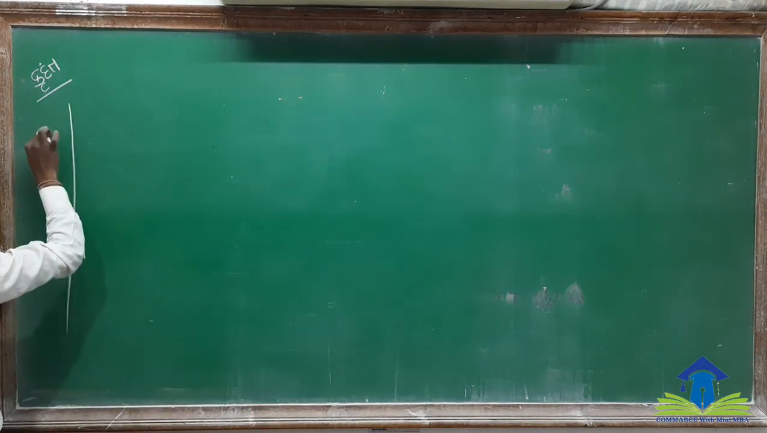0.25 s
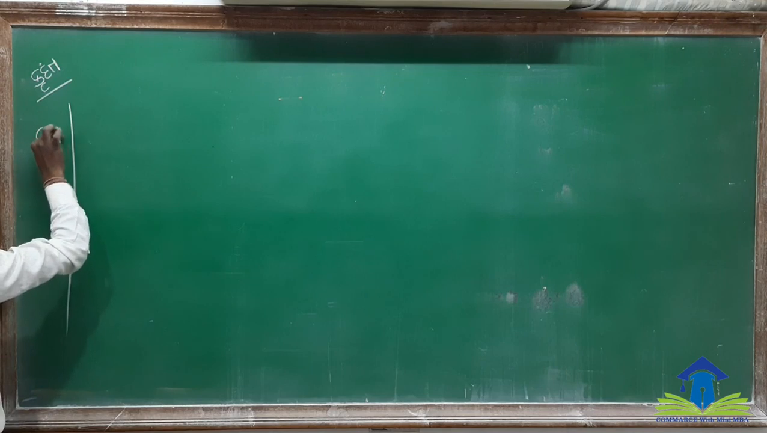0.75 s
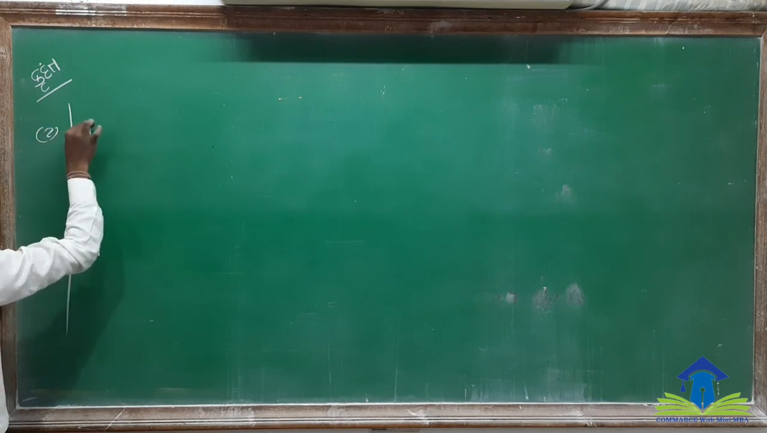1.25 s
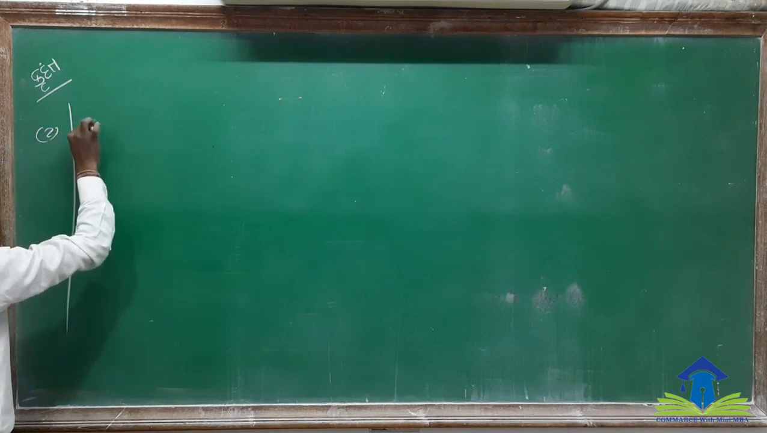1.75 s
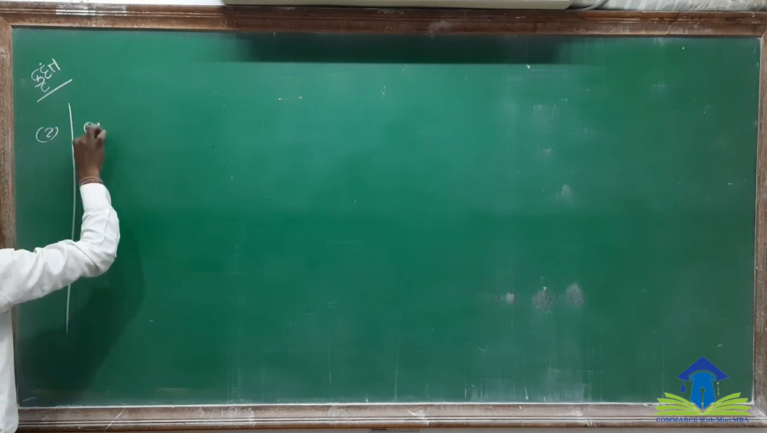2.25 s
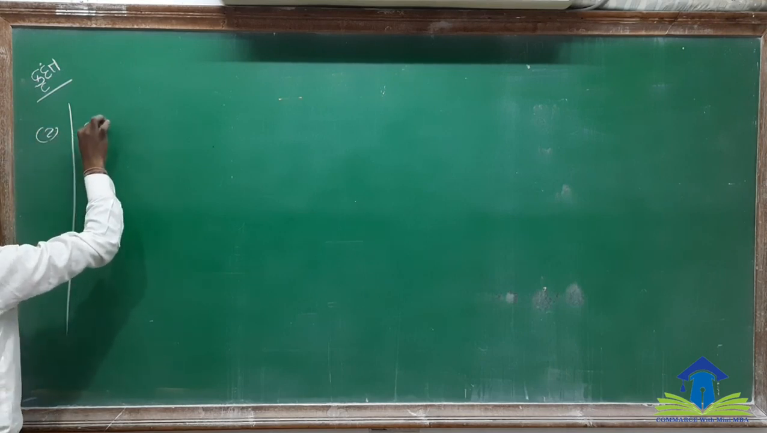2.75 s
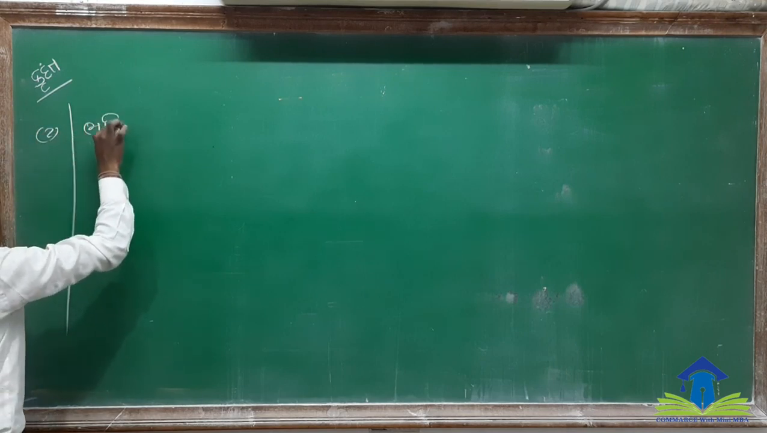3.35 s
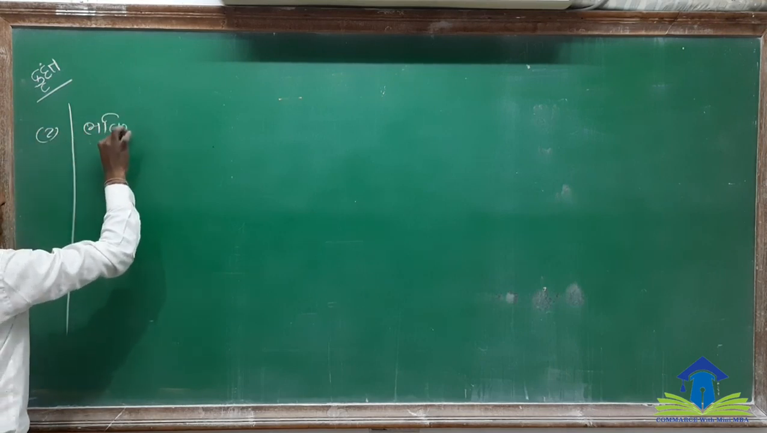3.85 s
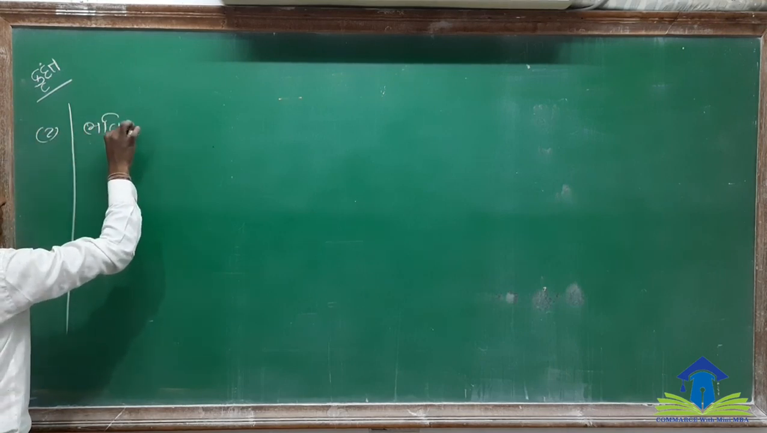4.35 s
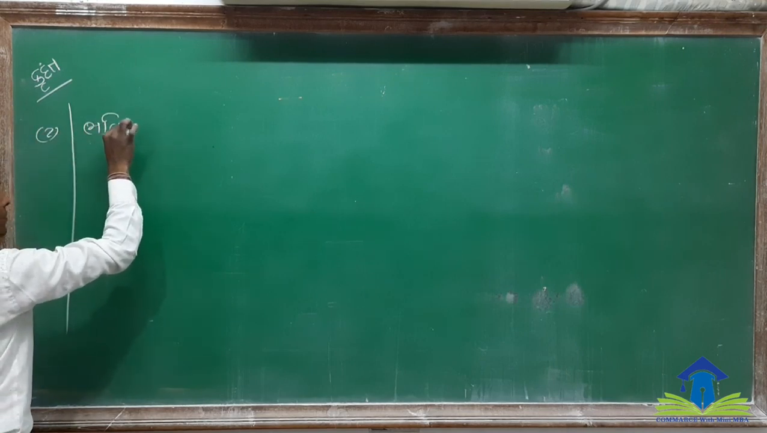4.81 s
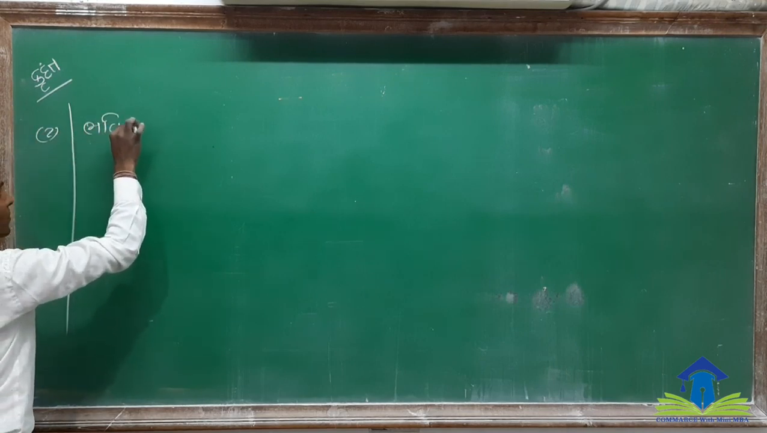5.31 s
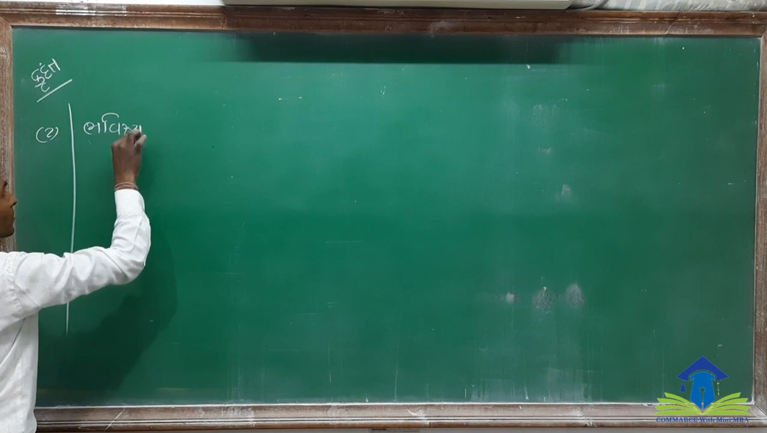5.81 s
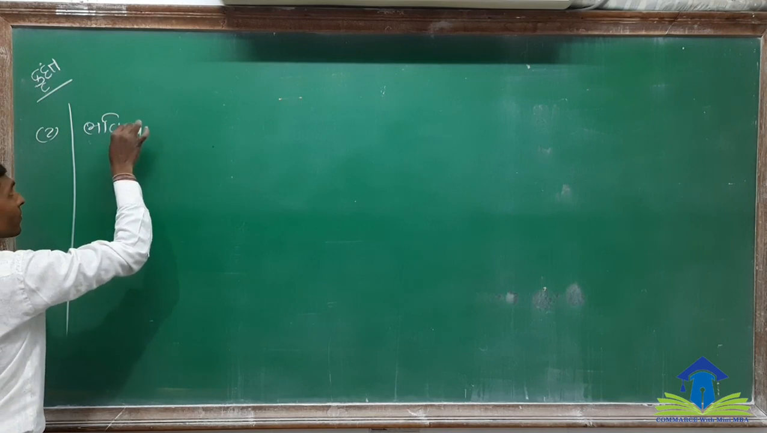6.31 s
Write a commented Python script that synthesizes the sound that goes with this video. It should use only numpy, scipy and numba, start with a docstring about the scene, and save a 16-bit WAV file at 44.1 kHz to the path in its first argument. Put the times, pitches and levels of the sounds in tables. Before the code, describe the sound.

Chalk writes on a chalkboard in a bare, echoing classroom, heard in stereo from a few metres away. A low rumble of fans and traffic runs underneath throughout, gently swelling and easing. From the start, short gritty hissing strokes come in an uneven rhythm, mixed with light, dull taps as the chalk lands, the clearest at about 0.7, 1.7 and 4.2 seconds. The chalk catches in a brief high squeak at 2.1 seconds, then louder ones at 2.8 and 3.3 seconds, each ringing in the room; the overall level dips slightly after the loud ones. Softer strokes continue until a short pause from about 4.3 to 5 seconds. Writing resumes, with a sharp double squeak around 5.6 seconds and a last faint stroke. At about 6.1 seconds two very faint, thin tones swell and fade together over the rumble.

```python
"""Chalk on a classroom board

A hand writes on a wall board in a bare, ringing room; two microphones stand metres away.
The chalk hisses along each stroke, taps down, and now and then sticks and slips into a squeak.
Fans and traffic rumble; two faint tones sound near the end. The gain ducks after loud squeaks."""
import sys
import numpy as np
from scipy import signal
from scipy.fft import rfft, irfft
from scipy.io import wavfile
from scipy.ndimage import uniform_filter1d
from numba import njit

SR = 44100
rng = np.random.default_rng(int(sys.argv[2]) if len(sys.argv) > 2 else 0)


def wav_record(signal):
    """Record a signal, one row per channel, as 16-bit PCM in the file named by sys.argv[1]."""
    frames = np.transpose(np.atleast_2d(signal))
    bounded = np.clip(frames, -1, 1)
    # unit amplitude maps onto the largest positive 16-bit level
    quanta = np.round(bounded * 32767).astype(np.int16)
    wavfile.write(sys.argv[1], SR, quanta)


N = 289886


def undb(db):
    return 10 ** (np.asarray(db) / 20)


def unit_rms(x):
    return x / np.sqrt(np.mean(x ** 2))


def log_interp(table, hz):
    """Read (f/Hz, value) points on a log-frequency axis."""
    f, value = np.transpose(table)
    return np.interp(np.log(np.maximum(hz, 1)), np.log(f), value)


def wander(rate_hz):
    """Random steps, smoothed twice; spread near 1."""
    hold = int(SR / rate_hz)
    steps = np.repeat(rng.standard_normal(N // hold + 1), hold)
    return 1.3 * uniform_filter1d(uniform_filter1d(steps, hold), hold)[:N]


def diffuse_field(size):
    """Spectra of noise from all sides at two microphones: alike in the bass, unrelated in the treble."""
    spacing_m, sound_m_s = 0.16, 343
    hz = np.arange(size // 2 + 1) * SR / size
    mid, side = rfft(rng.standard_normal((2, size)))
    coherence = 0.97 * np.sinc(2 * hz * spacing_m / sound_m_s)
    return hz, np.sqrt((1 + coherence) / 2) * mid + np.sqrt((1 - coherence) / 2) * np.array([side, -side])


def bands(hz):
    """Overlapping half-octave bands: (centre/Hz, weights)."""
    for centre_hz in 30 * 2 ** np.arange(0, 9.6, .5):
        yield centre_hz, np.clip(1 - 2 * np.abs(np.log2(np.maximum(hz, 1) / centre_hz)), 0, 1)


def chalk_hiss(t):
    """Grains crumble in dense uneven clicks and excite the stick's resonance; faster is brighter."""
    # strokes: full contact t/s, length/s, level/dB, change by the end/dB, tilt/(dB/octave)
    strokes = [ (0, .19, -32.5, -13.5, 0), (0.328, .16, -40.5, -0.5, 0.5), (0.571, .02, -36, -3.5, 1),
               (0.694, .06, -39, -2, 0), (0.793, .06, -34.5, -3.5, 1.5), (1.358, .195, -40, 0.5, 1.5),
               (1.684, .185, -45.5, 1.5, -1.5), (1.963, .09, -37, -4.5, -1), (2.17, .08, -36, -11.5, 1.5),
               (2.338, .03, -45, -1.5, -4), (2.416, .09, -43.5, 0, -1.5), (2.684, .14, -49.5, 6, -4.5),
               (2.866, .09, -41.5, 0.5, -0.5), (3.033, .07, -45, -7, -6), (3.175, .23, -43, -3, -2.5),
               (3.477, .07, -46.5, -11.5, -4), (3.703, .11, -54, 3.5, -3.5), (3.849, .06, -46, 0.5, 0.5),
               (3.973, .05, -44, -5.5, -1.5), (4.166, .1, -45.5, -10, -5), (4.985, .09, -44.5, -8, -0.5),
               (5.319, .1, -52, 6, -2), (5.44, .12, -39, -3, 3.5), (5.569, .07, -35, -18.5, -4.5),
               (5.76, .07, -55.5, -5, -6.5)]
    # grain spectrum: f/Hz, density/dB
    grit = [(900, -20), (1500, -8.5), (2300, -11), (3300, -3), (3900, -5), (4450, -10), (5100, -11),
            (6300, -7.5), (7800, -5.5), (10000, -16.5), (12200, -4.5), (13800, -6), (15500, -11.5)]
    # stick half catches and sings: t/s, level/dB, fade/(dB/s)
    catches = [(1.37, -58, 93.5), (1.68, -59, 39.5), (3.13, -51.5, 41.5)]
    press_db_s, lift_db_s, brighten_db_oct_s = 604.5, 379, 10.5
    stick_hz, stick_sigma_hz = 4460, 200
    start_s, length_s, level_db, change_db, tilt_db_oct = np.transpose(strokes)[:, :, None]
    age_s = t - start_s
    edges_db = press_db_s * np.minimum(age_s, 0) - lift_db_s * np.maximum(age_s - length_s, 0)
    press = undb(level_db + change_db * np.clip(age_s / length_s, 0, 1) + edges_db) + 1e-30
    tilt_db_oct = tilt_db_oct + brighten_db_oct_s * np.clip(age_s, 0, length_s)  # hand speeds up
    tilt_db_oct = np.sum(press * tilt_db_oct, axis=0) / press.sum(axis=0)
    grains = rfft(rng.standard_normal(N) * undb(2 * rng.exponential(size=N)))
    hz = np.arange(len(grains)) * SR / N
    treble_rms = np.sqrt(np.mean(np.abs(grains[hz > 13700]) ** 2) / N)
    grains = grains * undb(log_interp(grit, hz)) / treble_rms
    hiss = sum(irfft(grains * band, N) * undb(tilt_db_oct * np.log2(f / 14000))
               for f, band in bands(hz) if f > 600)
    sing = unit_rms(irfft(grains * np.exp(-.5 * ((hz - stick_hz) / stick_sigma_hz) ** 2), N))
    sing_gain = sum((t > s) * undb(db - fade * np.abs(t - s)) for s, db, fade in catches)
    return (hiss * press.max(axis=0) + sing * sing_gain) * undb(2.2 * wander(40))


def rumble(t):
    """Fans and traffic: noise bands that swell together and flicker alone."""
    # rumble spectrum: f/Hz, density/dB
    spectrum = [(18, -57), (30, -31), (45, -26.5), (59, -13), (80, -17), (100, -14), (122, -1.5),
                (140, -8.5), (158, 3), (180, -6), (230, -9.5), (303, -6), (340, -11), (600, -15.5),
                (2070, -32), (3200, -36.5), (4200, -49), (7650, -53), (15500, -64.5)]
    # rumble envelope: t/s, level/dB
    envelope = [(0, -39), (1, -39.5), (2, -38.5), (2.6, -38), (3.5, -41.5), (4.7, -45.5), (5.2, -39.5),
                (5.6, -38), (5.8, -40), (6.57, -43.5)]
    hz, field = diffuse_field(N)
    field = field * undb(log_interp(spectrum, hz))
    swell_db = 1.2 * wander(0.23)
    noise = sum(irfft(field * band, N) * undb(swell_db + 1.5 * wander(6.5)) for _, band in bands(hz))
    balance_db = np.array([[-.6], [.6]])
    return unit_rms(noise) * undb(np.interp(t, *np.transpose(envelope)) + balance_db)


def chalk_taps():
    """Each touch rings heavily damped board modes and a duller thud; soft chalk rounds the blow."""
    # chalk set down: t/s, level/dB, ring f/Hz, thud re ring/dB
    touches = [(0.3035, -27, 2460, 0), (0.6952, -15.5, 2560, -6), (1.6654, -20, 3040, -11),
               (2.6539, -23.5, 2400, 4), (3.051, -21.5, 2287, -2.5), (3.7015, -39, 1980, 14.5),
               (4.1651, -15, 2790, -7), (5.2908, -29.5, 1984, 0.5)]
    # board modes: multiple of ring f, width/Hz, level/dB
    modes = [(.75, 600, -5), (1, 355, -2), (1.2, 350, -6), (1.7, 1500, -15), (3.1, 2506, -17.5)]
    out, t = np.zeros(N + 2048), np.arange(2048) / SR

    def mode(hz, width_hz):
        return np.exp(-np.pi * width_hz * t) * np.sin(2 * np.pi * hz * t)

    thud = mode(650, width_hz=600) + mode(1300, width_hz=920)
    blow = 1 - np.exp(-t / 0.00009)
    for start_s, level_db, ring_hz, thud_db in touches:
        ring = sum(undb(db) * mode(ratio * ring_hz, width_hz) for ratio, width_hz, db in modes)
        i = int(start_s * SR)
        out[i:i + len(t)] += undb(level_db) * blow * (ring + undb(thud_db) * thud)
    return out[:N]


def chalk_squeaks(t):
    """The stick rings at its slip rate with two overtones; the grip wavers and grains roughen it."""
    # stick-slip squeaks: t/s, length/s, bite/s, glide/s, catch f/Hz, settled f/Hz, drift/(Hz/s),
    # level/dB, fade/(dB/s), 2nd partial/dB, 3rd partial/dB
    squeaks = [ (2.073, 0.099, 0.0015, 0.015, 4243, 4073, 898.5, -21.5, 259, -26, -37.5),
               (2.334, 0.11, 0.0062, .02, 4150, 4213, 2001.5, -52, 10.5, -20.5, -31.5),
               (2.754, .12, 0.0078, .035, 4252, 4082, -1100, -10.5, 76.5, -11.5, -23),
               (3.303, 0.19, 0.0043, 0.038, 4507, 4078, 502.5, -13, 48.5, -12.5, -13.5),
               (5.568, 0.099, 0.0058, .04, 4520, 4186, -100, -11.5, 67.5, -13, -9),
               (5.642, 0.051, 0.002, .03, 4470, 4204, 43, -12.5, 98, -14, -19)]
    release_db_s, dull_db_s = 899.5, 30
    waver, grip_db, rasp = 1 + .003 * wander(250), 1.5 * wander(86), 1 + .022 * wander(1200)
    out = np.zeros(N)
    for (start_s, length_s, bite_s, glide_s, catch_hz, settled_hz, drift_hz_s,
         level_db, fade_db_s, second_db, third_db) in squeaks:
        on = (t >= start_s) & (t < start_s + length_s + .1)
        age_s = t[on] - start_s
        glide = np.clip(1 - age_s / glide_s, 0, 1) ** 1.5
        hz = settled_hz + (catch_hz - settled_hz) * glide + drift_hz_s * age_s
        phase = 2 * np.pi * np.cumsum(hz * waver[on]) / SR
        dull_db = dull_db_s * age_s  # overtones die faster as the grip eases
        tone = np.sin(phase) + undb(second_db - dull_db) * np.sin(2 * phase)
        tone += undb(third_db - 2 * dull_db) * np.sin(3 * phase)
        attack = (1 - np.exp(-age_s / bite_s)) ** 2
        envelope_db = level_db - fade_db_s * age_s - release_db_s * np.maximum(age_s - length_s, 0)
        out[on] += np.sqrt(2) * undb(envelope_db + grip_db[on]) * attack * rasp[on] * tone
    return out


def faint_tones(t):
    """Two thin, slightly wavering tones swell and fade."""
    # far tones: start t/s, end t/s, f/Hz, level/dB
    tones = [(6.07, 6.36, 2950, -66), (6.08, 6.36, 2580, -68)]
    warped_s = t + 0.0085 * np.cumsum(wander(60)) / SR
    out = np.zeros(N)
    for start_s, end_s, hz, db in tones:
        swell = np.sin(np.pi * np.clip((t - start_s) / (end_s - start_s), 0, 1)) ** .5
        out += undb(db) * swell * np.sin(2 * np.pi * hz * warped_s)
    return out


def room_response():
    """Weak direct path, one strong early echo, then dense echoes that die away, the treble first."""
    # reverberation time: f/Hz, T60/s
    t60 = [(500, 0.43), (1500, 1.22), (2800, 0.9), (4200, 0.85), (8400, 0.59), (12500, 0.38), (15500, 0.13)]
    size, left_lag = 1 << 16, 16  # samples; the board is nearer the right microphone
    t = np.arange(size) / SR
    hz, field = diffuse_field(size)
    response = sum(irfft(field * band, size) * undb(-60 * t / log_interp(t60, f)) for f, band in bands(hz))
    response *= np.clip(.4 + t / .012, 0, 1)
    response /= np.sqrt(np.mean(np.sum(response ** 2, axis=1)))
    for delay, db in (0, -21), (int(.011 * SR), -16):
        response[0, delay + left_lag] += undb(db)
        response[1, delay] += undb(db)
    return response


@njit
def follow_level(x, attack_s, release_s):
    """One-pole follower with separate rise and fall times."""
    out, level = np.empty(len(x)), 0.
    for i in range(len(x)):
        level += (x[i] - level) / (SR * (attack_s if x[i] > level else release_s))
        out[i] = level
    return out


def scene():
    """Chalk and tones ring in the room, over the rumble."""
    t = np.arange(N) / SR
    sources = chalk_hiss(t) + chalk_taps() + chalk_squeaks(t) + faint_tones(t)
    return signal.fftconvolve(sources[None], room_response(), axes=1)[:, :N] + rumble(t)


def record(dry):
    """Gain control ducks after loud sounds and recovers slowly; a steep low-pass cuts the top."""
    threshold_db, slope, cutoff_hz = -16, 0.47, 15800
    level = follow_level(np.abs(dry).max(axis=0), attack_s=0.065, release_s=1.2)
    gain = np.minimum(undb(threshold_db) / (level + 1e-9), 1) ** slope
    return signal.sosfilt(signal.ellip(14, .3, 70, cutoff_hz, fs=SR, output="sos"), dry * gain)


dry = scene()
out = record(dry)
wav_record(out)
```